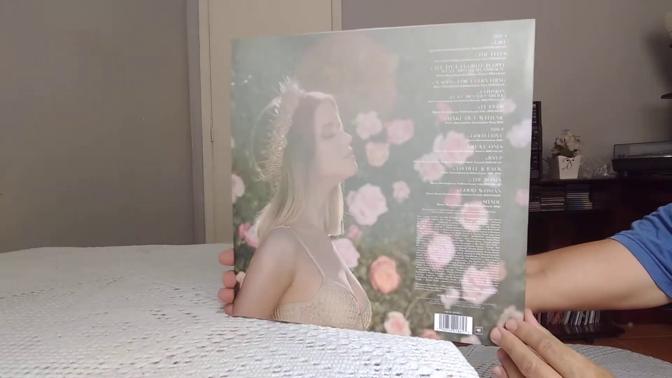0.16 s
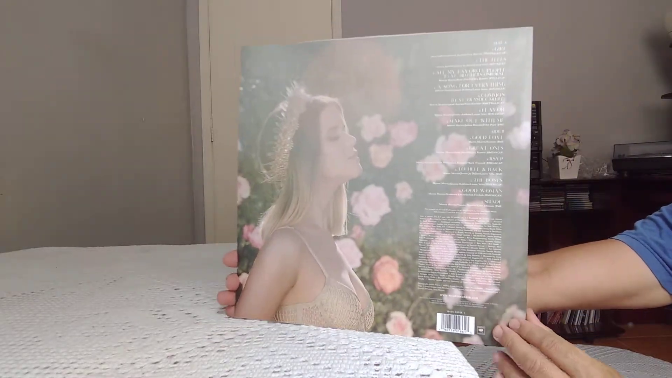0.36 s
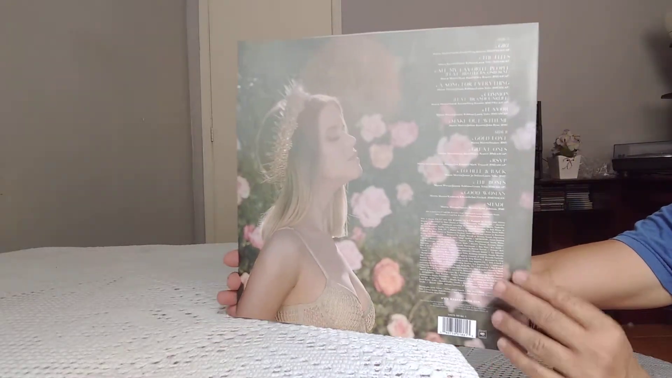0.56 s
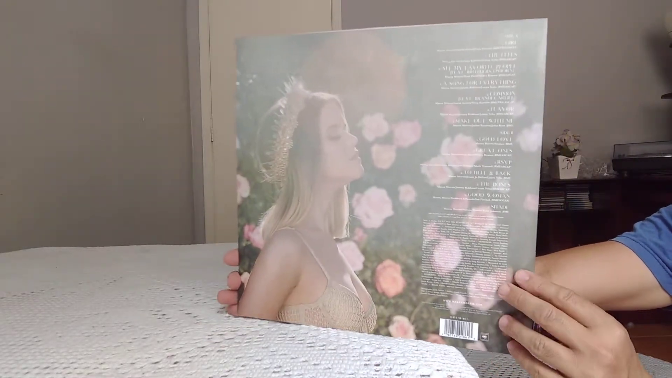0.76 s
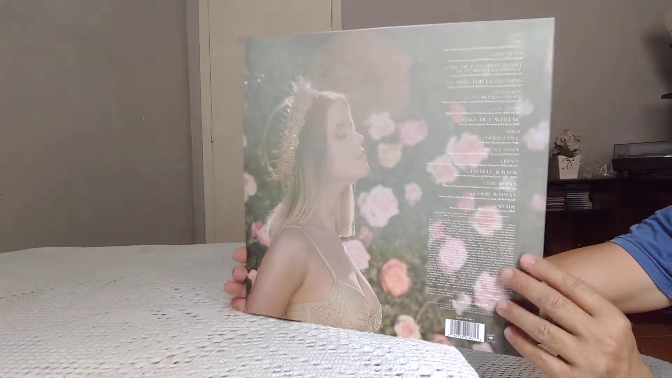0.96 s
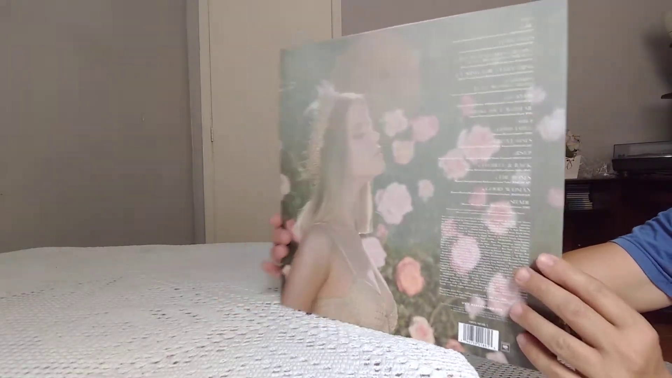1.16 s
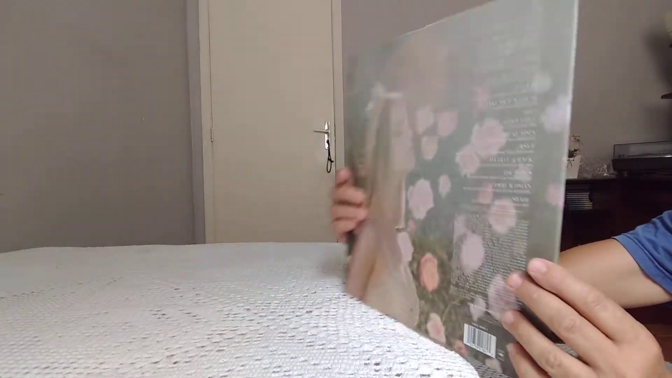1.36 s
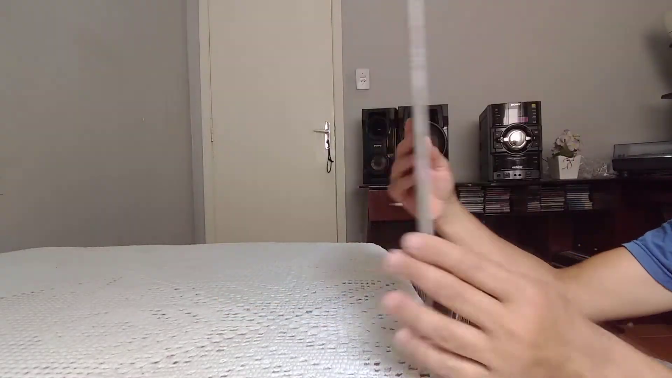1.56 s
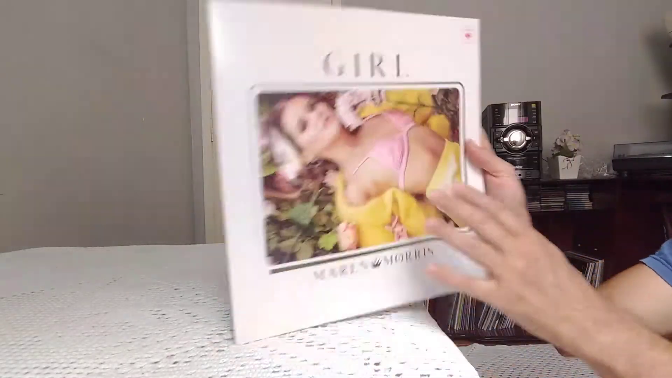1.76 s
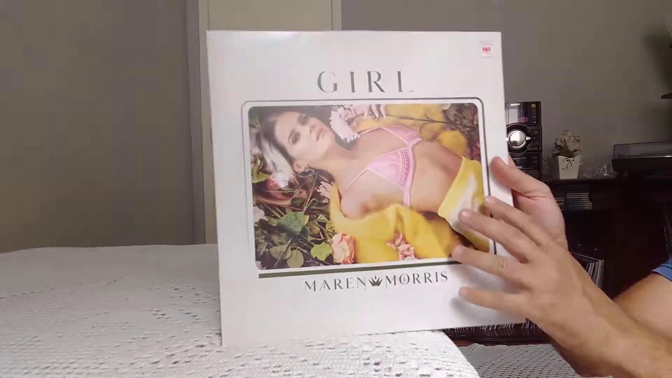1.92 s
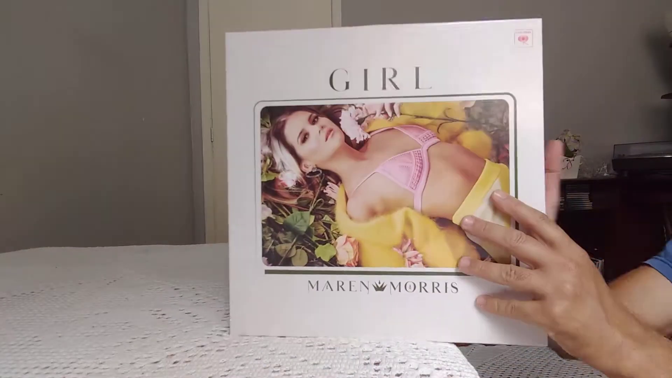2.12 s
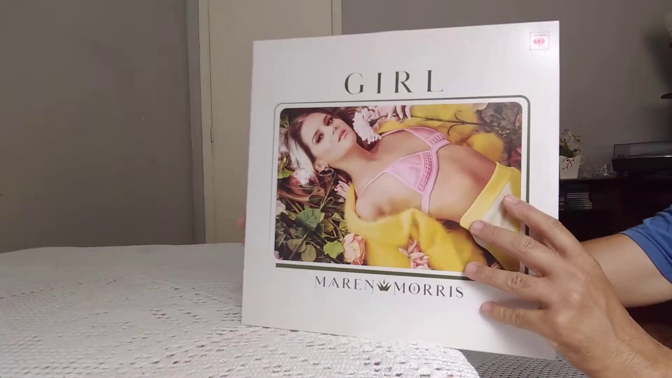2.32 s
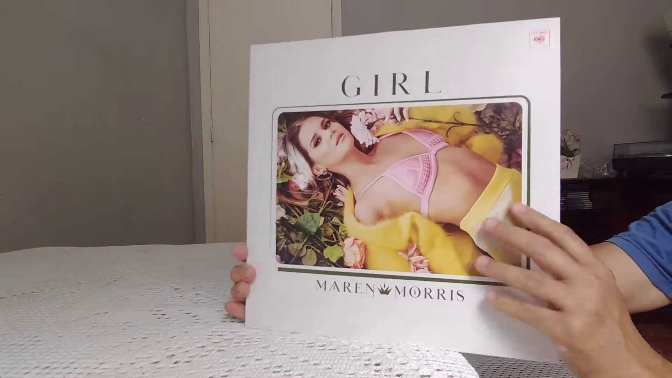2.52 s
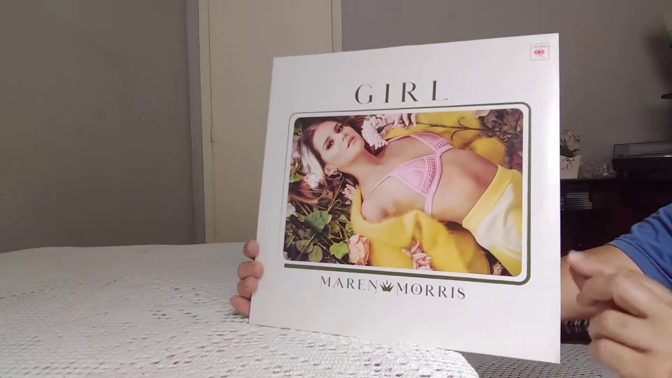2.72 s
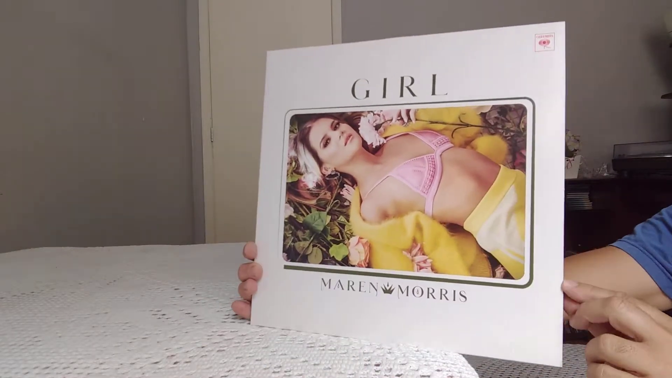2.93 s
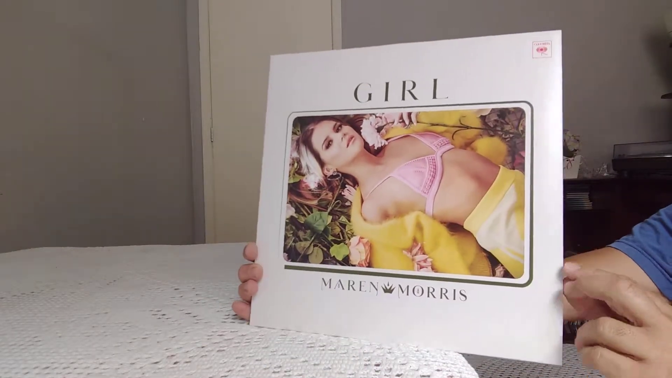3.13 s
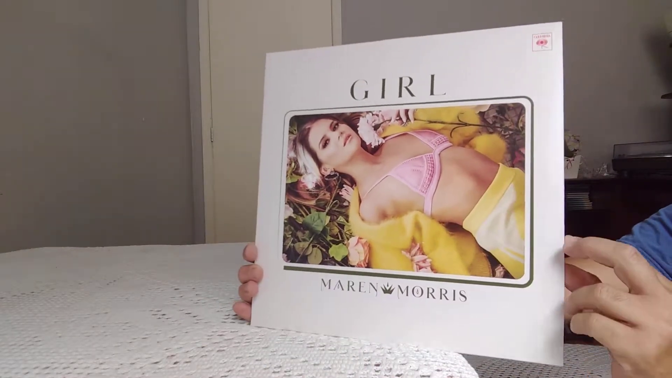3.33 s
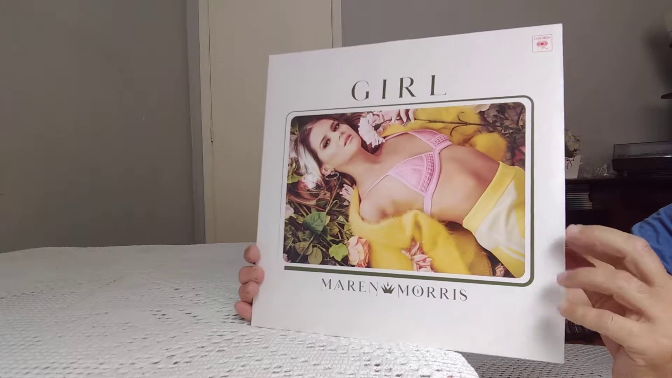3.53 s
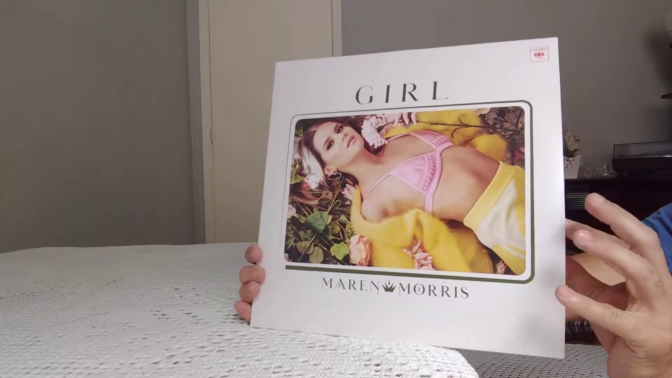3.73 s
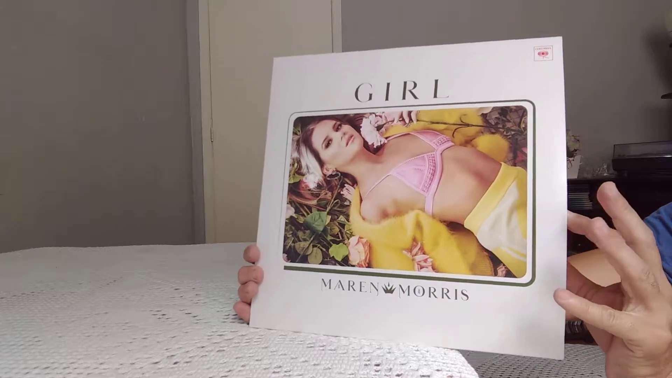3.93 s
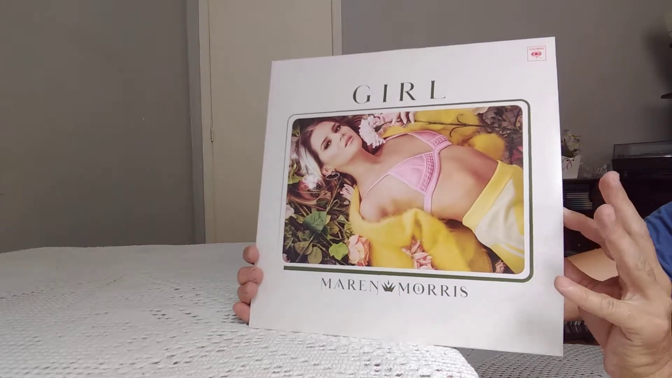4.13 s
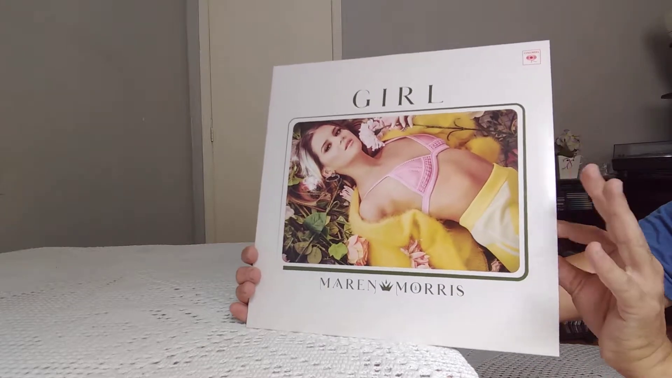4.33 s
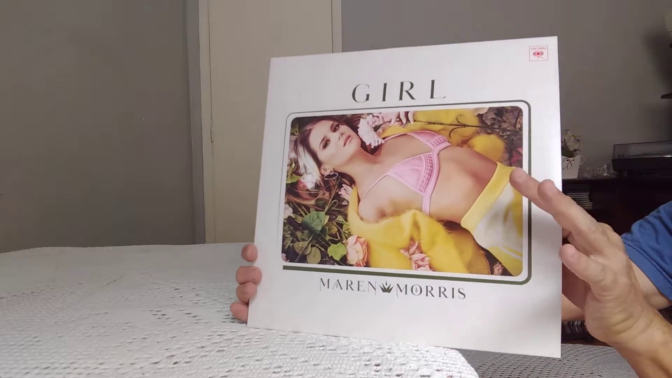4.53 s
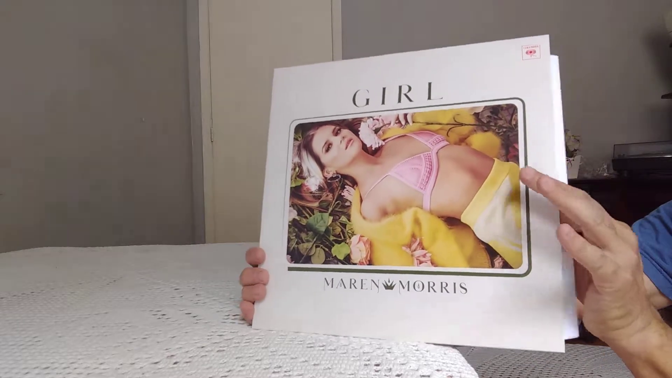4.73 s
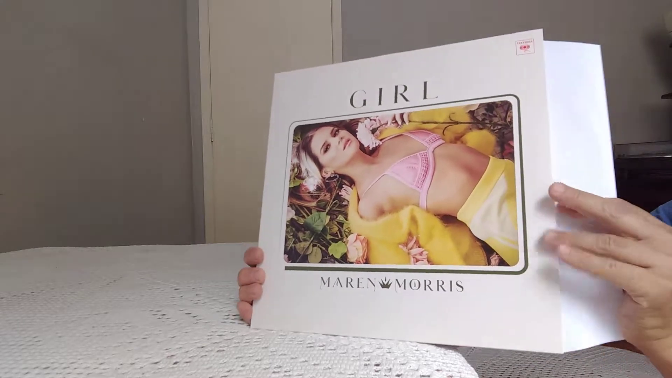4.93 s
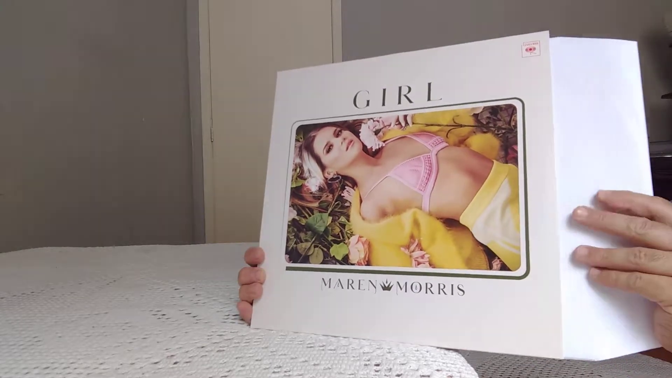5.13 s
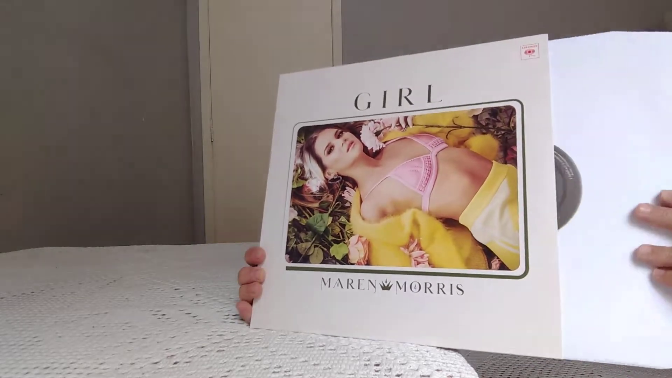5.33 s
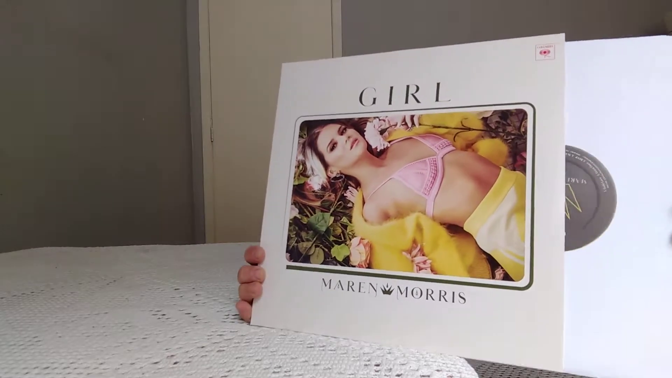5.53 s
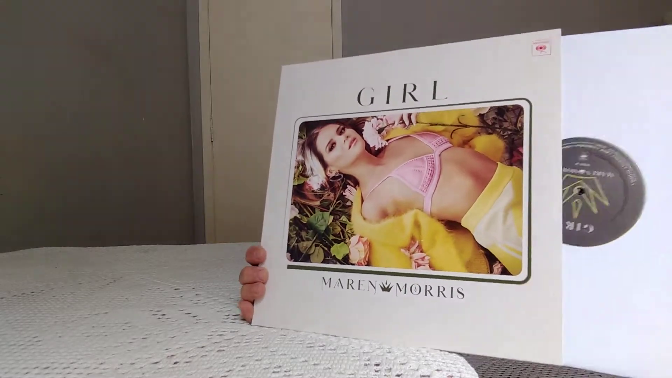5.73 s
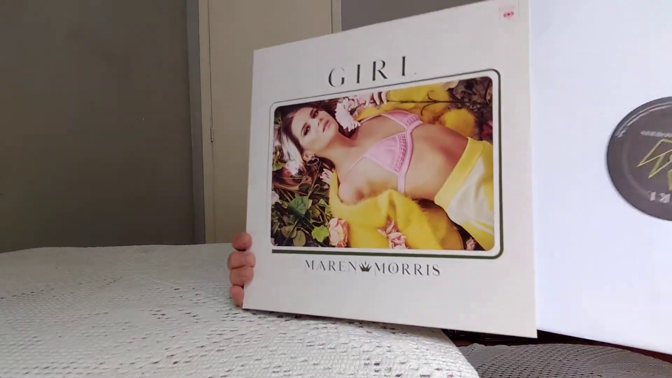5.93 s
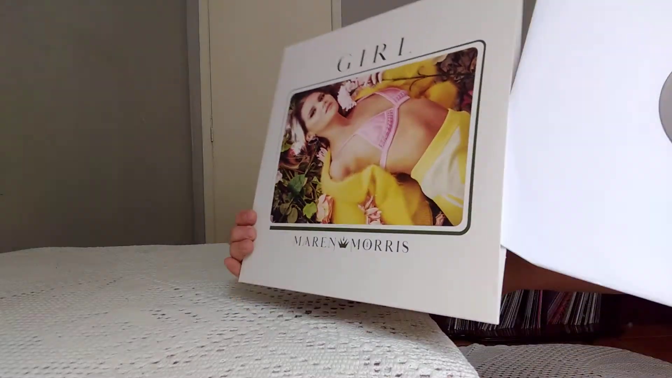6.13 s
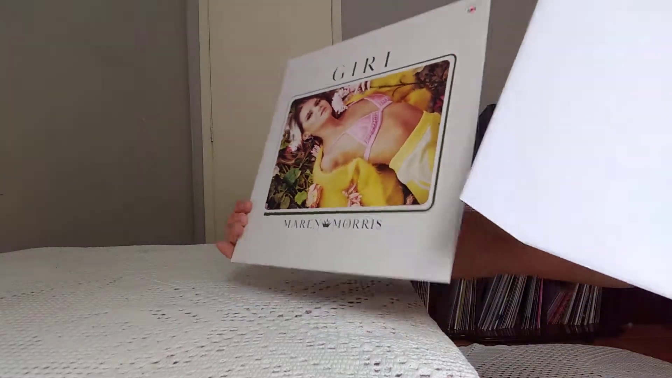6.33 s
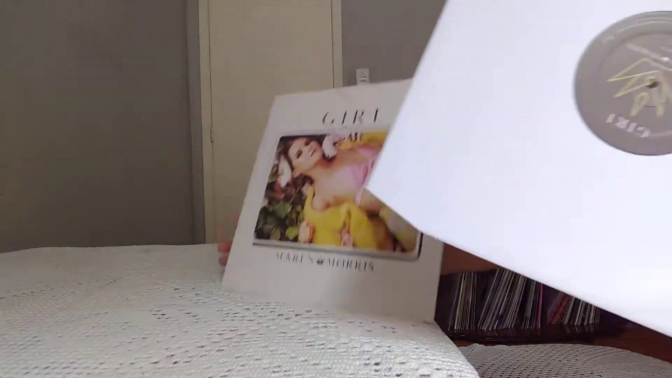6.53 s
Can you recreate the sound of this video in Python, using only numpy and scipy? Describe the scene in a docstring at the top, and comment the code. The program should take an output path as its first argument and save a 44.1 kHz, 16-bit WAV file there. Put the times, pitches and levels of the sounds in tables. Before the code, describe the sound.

Close stereo handling in a small quiet room, with steady low room air, faint hiss and a barely audible whine underneath. From 0 to 1 s, hands softly rub a plastic-wrapped card jacket. Around 1.1-1.7 s it is turned with a louder rustle, clustered crackles, dry ticks and a thin high squeak. Rubbing continues gently to 4.4 s, with small taps near 1.9, 2.4, 2.6, 3.5 and 3.8 s and a crisp scuff at 3.13. A firmer rub at 4.5 s leads into a grainy paper slide, lasting until about 5.6 s, with a sharp bright snap at 5.23, nearer the right. After a lull, a second pull starts at 5.7, catching strongly around 6.1 s with clicks, dull bumps and a high squeak. It eases by 6.4 s; two short, hollow cardboard knocks rattle at 6.58 and 6.63 s, just before the end.

```python
"""Record jacket handled on a cloth

A shrink-wrapped record jacket is turned over on a cloth-covered table in a quiet room: shaped noise rubs,
random slips crackle, and fingers tap and tick on the card. The paper inner sleeve slides out in two pulls,
its edge snapping once as a burst of dying modes, and the jacket's own modes ring as it knocks down at the end.
Faint squeaks and steady room air lie beneath. A small two-port recorder widens the stereo picture."""
import sys
import numpy as np
from scipy import signal
from scipy.fft import rfft, irfft, next_fast_len
from scipy.io import wavfile

SR = 44100
rng = np.random.default_rng(int(sys.argv[2]) if len(sys.argv) > 2 else 0)


def pcm_store(signal):
    """Save signal as 16-bit PCM."""
    levels = np.round(np.clip(np.atleast_2d(signal), -1, 1) * 32767)
    wavfile.write(sys.argv[1], SR, levels.astype(np.int16).T)


N = 294049
PADDED = next_fast_len(N + SR // 4, True)  # room for filter tails
TIME, FREQS = np.arange(N) / SR, np.fft.rfftfreq(PADDED, 1 / SR)

# what a fingernail tick or a crease rings with: pitch_hz [Hz], level_db [dB], t60_s [s]
TICK_MODES = [(920, -20.5, 0.013), (1570, -3, 0.0025), (2100, -9, .004), (3270, -8, 0.003),
              (6200, -13, .0012)]


def amp(db):
    """Decibels to gain."""
    return 10 ** (np.asarray(db) / 20)


def evened(x):
    """Scales to an rms of one."""
    return x / np.sqrt(np.mean(x ** 2) + 1e-20)


def read(points, hz):
    """Reads a spectrum table on a log-frequency axis."""
    f, value = np.transpose(points)
    return np.interp(np.log(hz + 1), np.log(f + 1), value)


def add(mix, s, sound):
    """Mixes a sound in at time s, cut off at the end of the scene."""
    part = mix[:, max(round(s * SR), 0):][:, :sound.shape[-1]]
    part += sound[..., :part.shape[1]]


def shaped(x, gain):
    """Filters a full-length signal by a gain for each frequency."""
    return irfft(rfft(x, PADDED) * gain, PADDED)[..., :N]


def low_cut(hz, order):
    """Gain that fades out the lows below hz."""
    return 1 / (1 + (hz / (FREQS + 1)) ** order)


def wander(hz):
    """Random drift, mostly slower than hz."""
    return evened(shaped(rng.standard_normal(N), 1 / (1 + (FREQS / hz) ** 4)))


def ports(pair):
    """Gives two unrelated signals the likeness that two ports hear, strongest in the middle."""
    # likeness of the two ports: pitch_hz [Hz], likeness [-1 to 1]
    likeness = [(60, 0.12), (130, 0.2), (300, 0.55), (640, 0.68), (1400, 0.5), (3000, -0.12), (14000, 0)]
    same = np.clip(read(likeness, FREQS), -1, 1)
    left = shaped(pair[1], same) + shaped(pair[0], np.sqrt(1 - same ** 2))
    return np.array([left, pair[1]])


def from_right(pair, amount):
    """The recorder's body shades the left port, mostly in the treble, from sounds on the right."""
    # full shading of the left port, scaled by amount: pitch_hz [Hz], level_db [dB]
    shadow = [(60, -4), (250, -2), (600, 0), (1200, -3.5), (2400, -2), (4400, -4.5), (8000, -7.5),
              (14000, -6.5)]
    return np.array([shaped(pair[0], amp(amount * read(shadow, FREQS))), pair[1]])


def ring(modes, t):
    """Sum of sine modes, each dying by 60 dB in its t60."""
    return sum(amp(db - 60 * t / t60) * np.sin(2 * np.pi * hz * t) for hz, db, t60 in modes)


def struck_card(centre_hz, t, reach_octaves=0.43):
    """A blow rings the jacket's modes nearest its own pitch."""
    # modes of the jacket: pitch_hz [Hz], level_db [dB, before the blow's weighting], t60_s [s]
    card_modes = [(120, -8, 0.16), (179, -2.5, .2), (240.5, 5, 0.097), (343, -0.5, 0.07),
                  (394, -2.5, 0.056), (616, -6, 0.064), (980, -19, 0.018), (1646, -13, 0.019),
                  (1890, -12, 0.018), (2060, -15.5, .022), (3220, -8, 0.015)]
    excited = []
    for hz, db, t60 in card_modes:
        distance = np.log2(hz / centre_hz) / reach_octaves
        excited.append((hz, db - 10 * np.log10(1 + distance ** 4), t60))
    return ring(excited, t)


def scatter(x, share, decay_s):
    """Card, table and hands return each sound many times within a few milliseconds."""
    t = np.arange(SR // 25) / SR
    response = rng.standard_normal((2, len(t))) * np.exp(-t / decay_s)
    returns = signal.fftconvolve(x, response / np.linalg.norm(response[0]), axes=1)[:, :N]
    return x + share * shaped(returns, low_cut(350, 2) / (1 + (FREQS / 11000) ** 4))


def together(levels_db):
    """Level of several unrelated sounds at once: their powers add."""
    return 10 * np.log10(sum(amp(db) ** 2 for db in levels_db) + 1e-20)


def stroke(s, rise, fall, db, hiss_db):
    """Scrape and hiss levels of one stroke: the contact speeds up and slows down along a bell."""
    bell_db = -20 / np.log(10) * ((TIME - s) / np.where(TIME < s, rise, fall)) ** 2
    return db + bell_db + np.array([[0], [hiss_db]])


def flexing(scrape_db, flex_db):
    """The card flexes more under harder rubbing, but grows more slowly than the scrape."""
    firm_db, growth = -51.5, 0.71  # scrape at which flexing is flex_db; dB of flexing per dB of scrape
    return flex_db + growth * (scrape_db - firm_db)


def friction(levels, colour, catch_db, chatter_db, trims_db, brightening, dulling=0.23):
    """Countless fibre slips shake the card; they clump into brief catches and the contact pressure chatters."""
    # resonances of the hand-held card: pitch_hz [Hz], width_hz [Hz], lift_db [dB]
    card_body = [(145, 8, 6), (181.5, 11.4, 11), (225, 5.9, 10.5), (271.4, 17, 5.5), (468, 59, 4.5),
                 (636, 23, 2.5), (868, 53, 2.5), (1234, 35, 4.5), (1836, 19, 4)]
    flex_db, scrape_db, hiss_db = levels
    grip = evened(amp(catch_db * wander(680) + chatter_db * wander(37)))
    # contact passes between patches of card, each with its own paths to the ports
    contact = np.array([wander(2.49) for _ in range(4)]) ** 2
    contact /= np.linalg.norm(contact, axis=0)
    patches = sum(c * scatter(rng.standard_normal((2, N)), share=0.95, decay_s=0.009) for c in contact)
    drive = ports(grip * patches)
    lift_db = sum(db / (1 + (2 * (FREQS - hz) / width) ** 2) for hz, width, db in card_body)
    body = amp(read(colour, FREQS) + lift_db)
    # low notes are the flexing card, the middle is the scraping contact, the top is surface hiss
    above_flex, above_scrape = low_cut(600, 6), low_cut(5000, 8)
    shares = 1 - above_flex, above_flex - above_scrape, above_scrape
    flex, scrape, hiss = (evened(shaped(drive, share * body)) * amp(db + trim)
                          for share, db, trim in zip(shares, levels, trims_db))
    # faster rubbing is brighter as well as louder
    top = shaped(hiss, low_cut(8000, 8))
    brighter = top * (amp(brightening * (hiss_db + 64.0)) - 1)
    # a soft contact that hisses little also loses the upper part of its scrape
    edge = shaped(scrape, low_cut(2500, 4))
    duller = edge * (amp(dulling * (hiss_db - scrape_db)) - 1)
    return flex + scrape + hiss + brighter + duller


def clicking(pushes, modes):
    """Each sudden push rings briefly and reaches the left port a little later."""
    lag_s = 0.00023
    t = np.arange(SR // 30) / SR
    click = np.array([ring(modes, np.maximum(t - lag_s, 0)), ring(modes, t)])
    return signal.oaconvolve(pushes[None], click, axes=1)[:, :N]


def crackle(level_db, modes, per_s, spread_db):
    """Tiny separate slips at random moments, a few of them larger."""
    sizes_db = level_db + spread_db * np.minimum(rng.exponential(1, N), 3)
    pushes = amp(sizes_db) * rng.choice([-1., 1.], N)
    return clicking(pushes * (rng.random(N) < per_s / SR), modes)


def pocket(level_db, width_hz):
    """Scraping sounds the air in the jacket's pocket: a broad, moving resonance."""
    # air resonance, moving as the card bulges and the mouth opens: time_s [s], pitch_hz [Hz]
    air_path = [(1.4, 1049), (2.5, 1448), (3.5, 1198), (3.8, 882), (4.0, 930), (4.27, 1084), (4.5, 1110),
                (4.6, 1200), (4.9, 1540), (5.2, 1500), (5.38, 1398), (5.6, 1268), (5.74, 1330), (5.9, 1540),
                (6.15, 1473)]
    turns = np.cumsum(np.interp(TIME, *np.transpose(air_path))) / SR
    drift = np.array([wander(width_hz), wander(width_hz)])
    return ports(evened(drift * np.sin(2 * np.pi * turns)) * amp(level_db))


def background(air_db=-60.5, whine_hz=1800, whine_db=-82):
    """Room air is coloured noise, heard as steady rumble and hiss; a narrow noise band whines faintly."""
    # colour of the room air: pitch_hz [Hz], density_db [relative dB per Hz]
    air_colour = [(25, -17), (40, -1), (56, 16.5), (80, -6), (150, 3.5), (220, -2.5), (320, -4),
                  (500, -9.5), (1000, -12.5), (1800, -17), (3000, -20.5), (5500, -17.5), (8000, -23.5),
                  (14000, -29.5)]
    air = evened(shaped(ports(rng.standard_normal((2, N))), amp(read(air_colour, FREQS))))
    whine = evened(shaped(rng.standard_normal((2, N)), 1 / (1 + ((FREQS - whine_hz) / 45) ** 2)))
    return amp(air_db) * air + amp(whine_db) * whine


def squeaks(width_share=0.025, trim_db=-1):
    """Skin and card squeak and groan: short fuzzy whistles swell and fade, sliding as the grip changes."""
    # start_s [s], length_s [s], pitch_hz [Hz, midway], glide_hz [Hz], level_db [dB, before trim and swell]
    whistles = [(.0, 0.098, 2690, 0, -66.5), (0.059, 0.14, 5850, 100, -66), (0.384, 0.19, 3300, 0, -70.5),
                (0.765, 0.17, 6050, -100, -71), (1.459, .12, 222.8, 0, -57), (1.492, 0.11, 6230, -60, -54),
                (1.59, .17, 5980, -300, -62), (2.393, 0.11, 6170, -120, -64.5), (2.898, 0.2, 5640, 0, -72),
                (3.173, 0.19, 6020, -80, -67), (3.38, .2, 5990, -100, -69), (4.262, 0.0277, 1089, 0, -58.5),
                (6.215, 0.16, 6720, -180, -53)]
    out = np.zeros((2, N))
    for s, length, hz, glide, db in whistles:
        t = np.arange(round(length * SR)) / SR
        turns = np.cumsum(hz + glide * (t / length - .5)) / SR
        low_pass = signal.butter(2, width_share * hz, fs=SR)
        fuzz = signal.lfilter(*low_pass, rng.standard_normal((2, SR)))[:, -len(t):]
        whistle = evened(fuzz * np.sin(2 * np.pi * turns))
        add(out, s, amp(db + trim_db) * whistle * np.sin(np.pi * t / length))
    return out


def jacket(pocket_db=-10, pocket_width_hz=260, crackle_db=-1):
    """Hands and tablecloth rub the wrapped card, and the wrap crackles under them."""
    # colour of rubbing on the wrap: pitch_hz [Hz], density_db [relative dB per Hz]
    wrap_colour = [(50, -13), (100, 6.5), (140, 8.5), (220, 3.5), (350, 1.5), (650, -1), (1200, -2),
                   (1900, 1.5), (2800, 2.5), (4400, 0), (5600, -7.5), (7200, -11), (11000, -11.5),
                   (14000, -15)]
    # strokes of hands and tablecloth over the jacket, levels before trims:
    # fastest_s [s], rise_s [s], fall_s [s], scrape_db [dB], hiss_db [dB above scrape]
    strokes = [(0.12, 0.16, 0.14, -61, -8.5), (1.0, 0.066, 0.056, -69.5, 4.5),
               (1.135, 0.064, 0.1, -58.5, 0.5), (1.29, 0.066, 0.052, -57, 2),
               (1.35, 0.046, 0.1, -50.5, -0.5), (1.46, 0.052, 0.065, -53, 3),
               (1.615, 0.08, 0.047, -61.5, 9.5), (1.7, 0.067, 0.18, -61.5, 1.5),
               (1.87, 0.093, 0.23, -57, -5), (2.065, 0.093, 0.064, -57, 0), (2.17, 0.043, 0.078, -59.5, -4),
               (2.44, 0.13, 0.056, -60.5, -5.5), (2.63, 0.15, 0.052, -57.5, 3),
               (2.78, 0.08, 0.13, -66, -10), (2.96, 0.18, 0.081, -64, -5), (3.128, 0.008, 0.0086, -51, -4),
               (3.25, 0.065, 0.39, -64, -7), (3.52, 0.04, 0.14, -59.5, -3.5),
               (3.78, 0.065, 0.054, -59, -4.5), (3.95, 0.047, 0.033, -61, -6),
               (4.28, 0.036, 0.045, -64, -2), (4.485, 0.086, 0.11, -52.5, -2)]
    # the holding hand never rests entirely: its scrape, its hiss above that, how much and how fast it fidgets
    hold_db, hold_hiss_db, fidget_db, fidget_hz = -68, -9, 2, 3.7
    hold = hold_db + fidget_db * wander(fidget_hz) + np.array([[0], [hold_hiss_db]])
    scrape_db, hiss_db = together([hold] + [stroke(*row) for row in strokes])
    levels = flexing(scrape_db, flex_db=-55.5), scrape_db, hiss_db
    rub = friction(levels, wrap_colour, catch_db=0.45, chatter_db=1.28, trims_db=(.5, -2, 2), brightening=0.27)
    creases = crackle(scrape_db + crackle_db, TICK_MODES, per_s=110, spread_db=5.0)
    return from_right(rub + creases + pocket(scrape_db + pocket_db, pocket_width_hz), amount=0.83)


def ticks():
    """Fingernails and stiff creases of the wrap click against the card, each a push that rings the tick modes."""
    # sharp ticks: start_s [s], push_db [dB, before the ringing]
    clicks = [(.9958, -43), (1.2065, -43), (1.3462, -37), (1.3645, -38), (1.3935, -40), (1.4355, -32),
              (1.4372, -35), (1.6283, -37), (1.7467, -41), (1.8505, -41), (1.8853, -42), (1.9994, -42),
              (2.3556, -42), (2.3701, -43), (2.4233, -36), (2.4262, -39), (2.441, -42), (2.6077, -35.5),
              (2.6108, -40), (2.9582, -40), (3.4955, -38), (3.5007, -36.5), (3.5224, -41), (3.549, -42),
              (3.6545, -41.5), (3.7928, -42), (3.7962, -42), (4.0092, -47), (4.2645, -47), (4.4253, -40),
              (4.4904, -40), (4.4985, -39), (6.0835, -37), (6.1178, -33), (6.134, -31), (6.1595, -36)]
    pushes = np.zeros((1, N))
    for s, db in clicks:
        add(pushes, s, amp([db]))
    return from_right(clicking(pushes[0], TICK_MODES), amount=0.73)


def room(x):
    """Sparse reflections of a small furnished room, fed by the right port, the highest treble dying first."""
    # reverberation: pitch_hz [Hz], t60_s [s]
    reverb_times = [(150, 0.54), (1000, 0.31), (5000, 0.38), (14000, 0.041)]
    echoes = rng.choice([-1., 1.], (2, SR // 2)) * (rng.random((2, SR // 2)) < 3000 / SR)
    echoes[:, :SR // 200] = 0  # nothing returns in the first 5 ms
    hz, t, z = signal.stft(echoes, SR, nperseg=256)
    decay = amp(-60 * t / read(reverb_times, hz)[:, None])
    tail = signal.istft(z * decay, SR, nperseg=256)[1]
    return ports(signal.fftconvolve(x[1:], tail / np.linalg.norm(tail[0]), axes=1)[:, :N])


def taps(width_octaves=0.6, treble_db=-4, scuff_db=-5, ring_db=-4, damping_s=0.0068):
    """Each touch lands with a short scuff and rings the card, which the hand quickly damps."""
    # taps and scuffs of fingers and edges on the card, levels before the trims above:
    # start_s [s], level_db [dB], centre_hz [Hz], treble_db [dB], decay_s [s, of the scuff]
    touches = [(1.333, -43, 1230, -15, 0.0075), (1.344, -39, 1190, 0, 0.012),
               (1.374, -39.5, 900, -12, 0.0064), (1.424, -37, 2600, -15, 0.0091),
               (1.434, -38, 1200, -8, 0.004), (1.626, -40, 1170, -6, 0.0026), (1.82, -41, 360, -18, 0.006),
               (1.868, -43.5, 610, -8, 0.0053), (1.998, -46.5, 1730, -19, 0.0073),
               (2.424, -44, 1500, -17, 0.005), (2.608, -44, 1600, -21, 0.0067),
               (3.126, -39, 2000, -4, 0.0031), (3.129, -37, 1300, 2, 0.0025),
               (3.495, -43, 1210, -19, 0.0045), (3.521, -41.5, 1070, 1, 0.005),
               (3.654, -41, 754, -30, 0.003), (3.778, -48.5, 886, -30, .005),
               (3.793, -46, 780, -30, 0.0082), (4.009, -44, 860, -30, 0.0049),
               (4.265, -47, 1080, -9, 0.007), (4.413, -45, 1330, -20, .005),
               (4.423, -44.5, 1100, -30, 0.0072), (4.465, -47.5, 800, -25, 0.0055),
               (4.489, -38.5, 800, -20, 0.008), (4.501, -39.5, 1050, -24, 0.0079),
               (5.713, -39.5, 970, 7, 0.0081), (6.021, -39, 450, -15, .01), (6.08, -35, 345, -3, 0.009),
               (6.104, -40, 750, -10, .008), (6.133, -31, 800, -5, 0.0044), (6.166, -40.5, 140, -30, 0.021),
               (6.285, -36.5, 1410, -20, 0.0062), (6.298, -34.5, 242, -17, 0.0083),
               (6.6275, -39, 3400, -20, .005), (6.636, -36, 1700, -20, .004)]
    scuffs, rings = np.zeros((2, N)), np.zeros((2, N))
    t = np.arange(4096) / SR
    hz = np.fft.rfftfreq(len(t), 1 / SR) + 1
    for s, db, centre, bright, decay in touches:
        body = 1 / (1 + (np.log2(hz / centre) / width_octaves) ** 2)
        treble = amp(bright + treble_db) / (1 + (3500 / hz) ** 4) / (1 + (hz / 8000) ** 2)
        scuff = evened(irfft(rfft(rng.standard_normal((2, len(t)))) * (body + treble)))
        envelope = np.exp(-t / decay) * (1 - np.exp(-t / 0.00044))
        add(scuffs, s, amp(db + scuff_db) * scuff * envelope)
        add(rings, s, amp(db + ring_db) * struck_card(centre, t) * np.exp(-t / damping_s))
    return from_right(ports(scuffs) + rings, amount=0.43)


def pull(curve):
    """Scrape and hiss levels of one pull on the sleeve, silent outside it."""
    # hiss grows as more paper comes into the open and falls once the sleeve is free:
    # time_s [s], hiss_db [dB above scrape]
    paper_hiss = [(4.6, -9), (4.85, -0.5), (5.17, -3), (5.3, 1.5), (5.6, 1.5), (5.9, 5.5), (6.13, 2.5),
                  (6.26, 1), (6.42, -5), (6.667, -4)]
    scrape_db = np.interp(TIME, *np.transpose(curve), -120, -120)
    return np.array([scrape_db, scrape_db + np.interp(TIME, *np.transpose(paper_hiss))])


def bump(s, db, rise_s=.01, fall_s=0.021):
    """Level of the flexing around a bump: a quick rise and a steady decay."""
    return db - 20 / np.log(10) * np.maximum((s - TIME) / rise_s, (TIME - s) / fall_s)


def sleeve(pocket_db=-11, pocket_width_hz=130, grain_db=3.5):
    """Paper slides out to the right, its fibres catching on the card."""
    # colour of rubbing paper: pitch_hz [Hz], density_db [relative dB per Hz]
    paper_colour = [(50, 3.5), (150, -5.5), (260, -6), (400, -9.5), (750, -5), (1050, 1.5), (1500, 2),
                    (2300, 1.5), (3200, 4.5), (4400, 0.5), (6200, -6), (7500, -7), (11000, -8),
                    (14000, -13)]
    # what a catching paper fibre rings with: pitch_hz [Hz], level_db [dB], t60_s [s]
    fibre_modes = [(1900, -6, 0.0032), (3600, -2, 0.0016), (6000, -5, .0012)]
    # pulls following the pulling speed, the edge snapping free in the first, which then runs out:
    # time_s [s], scrape_db [dB, before trims]
    first_pull = [(4.58, -68), (4.69, -50.5), (4.79, -49.5), (4.86, -50), (5.0, -51), (5.19, -52),
                  (5.25, -51), (5.33, -57), (5.46, -57.5), (5.52, -63), (5.69, -69)]
    second_pull = [(5.695, -65), (5.73, -55), (5.82, -50.5), (5.91, -51.5), (6.065, -51.5), (6.13, -43),
                   (6.19, -55), (6.26, -57), (6.42, -66), (6.667, -60.5)]
    # the paper catches on the jacket's mouth, levels before trims:
    # fastest_s [s], rise_s [s], fall_s [s], scrape_db [dB], hiss_db [dB above scrape]
    catches = [(4.85, .025, 0.037, -48.5, -10), (5.718, .008, 0.01, -56, 3), (6.1, 0.023, 0.031, -46, -6),
               (6.225, .015, 0.02, -56, 3.5), (6.282, 0.0087, 0.026, -51.5, 5.5),
               (6.55, 0.024, 0.017, -64.5, 4)]
    # the sleeve's rim bumps the card as it leaves and makes it flex: peak_s [s], flex_db [dB, before trims]
    rim_bumps = [(5.715, -48), (6.025, -48), (6.081, -50), (6.135, -45), (6.3, -42), (6.6, -46),
                 (6.635, -43)]
    pulls = [pull(first_pull), pull(second_pull)]
    scrape_db, hiss_db = together(pulls + [stroke(*row) for row in catches])
    flex_db = together([flexing(scrape_db, flex_db=-59)] + [bump(*row) for row in rim_bumps])
    rub = friction((flex_db, scrape_db, hiss_db), paper_colour,
                   catch_db=0.5, chatter_db=1.0, trims_db=(1.5, -.5, 4), brightening=0.12)
    grain = crackle(scrape_db + grain_db, fibre_modes, per_s=230, spread_db=3.8)
    return from_right(rub + grain + pocket(scrape_db + pocket_db, pocket_width_hz), amount=0.97)


def snap(start_s=5.2262, level_db=-4, shudder_lag_s=.001, left_db=-15, lowest_hz=170):
    """The paper edge buckles with a crack near the right port; the card shudders, too small for deep bass."""
    # modes of the sleeve's edge: pitch_hz [Hz], level_db [dB, before the snap's level], t60_s [s]
    edge_modes = [(1110, -20.5, 0.0072), (2094, -16.5, .007), (2970, -7, 0.0029), (3480, -14, .004),
                  (4300, -8.5, .0035), (6200, 4.5, 0.0018), (7080, 8, 0.0011), (8091, -14, .003),
                  (9800, -4.5, 0.0028), (12600, -5, .001)]
    # modes of the shuddering card: pitch_hz [Hz], level_db [dB, before the snap's level], t60_s [s]
    shudder_modes = [(268, -37.5, 0.09), (347, -31.5, 0.028), (470, -36, .012), (636, -30, 0.009)]
    out, t = np.zeros((2, N)), np.arange(SR // 8) / SR
    onset = 1 - np.exp(-t / 0.00021)
    add(out, start_s, amp(level_db) * ring(edge_modes, t) * onset)
    add(out, start_s + shudder_lag_s, amp(level_db) * ring(shudder_modes, t))
    out[0] = shaped(out[0], amp(left_db * low_cut(2000, 2)))  # the left port loses the treble
    return signal.lfilter(*signal.butter(2, lowest_hz, "high", fs=SR), out)


def knocks(rattle_db=-22, rattle_s=0.031, left_db=-4):
    """The jacket meets the table and rings freely, with a brief rattle of loose card."""
    # start_s [s], level_db [dB, scales ring and rattle], centre_hz [Hz that the blow excites most]
    blows = [(6.5838, -32.5, 450), (6.5857, -26, 1730), (6.588, -35, 600), (6.631, -25, 1690),
             (6.6337, -29.5, 234)]
    out, t = np.zeros((2, N)), np.arange(SR // 4) / SR
    for s, db, centre in blows:
        low_pass = signal.butter(2, centre, fs=SR)
        rattle = evened(signal.lfilter(*low_pass, rng.standard_normal((2, len(t)))))
        add(out, s, amp(db) * (struck_card(centre, t) + amp(rattle_db) * rattle * np.exp(-t / rattle_s)))
    return out * amp([[left_db], [0]])


def scene():
    """Rubbing, blows and their reflections over the room's background."""
    fingers, bumps = taps() + ticks(), knocks()
    crack = scatter(snap(), share=0.37, decay_s=0.0025)
    # the crack beams its brightest part at the recorder, so the room gets less of that
    beam_db, beam_hz, beam_width_hz = -7, 6200, 900
    spilled = shaped(crack, amp(beam_db / (1 + ((FREQS - beam_hz) / beam_width_hz) ** 2)))
    echoes = room(amp(-8.0) * fingers + amp(-12.5) * bumps + amp(-15.5) * spilled)
    handling = jacket() + sleeve() + fingers + bumps + crack
    return handling + echoes + squeaks() + from_right(background(), amount=0.068)


def record(dry):
    """The widener subtracts a delayed copy of each port from the other; then the bass cut and the band limit."""
    # share of the opposite port that is subtracted: pitch_hz [Hz], level_db [dB]
    crossfeed = [(60, -5), (600, -5.5), (1200, -3), (2450, -.4), (3700, -3.5), (5000, -4), (7500, -9),
                 (14000, -9)]
    delay_s, feedback, bass_cut_hz, top_hz = .000407, 0.33, 44, 14350
    cross = amp(read(crossfeed, FREQS)) * np.exp(-2j * np.pi * FREQS * delay_s)
    # part of the delayed copy circulates, which narrows the notches of the comb
    loop = feedback * cross
    mid = shaped(dry[0] + dry[1], (1 - cross) / (1 - loop))
    side = shaped(dry[0] - dry[1], (1 + cross) / (1 + loop))
    wide = np.array([mid + side, mid - side]) / 2
    cut = signal.sosfilt(signal.butter(4, bass_cut_hz, "high", fs=SR, output="sos"), wide)
    band_limit = signal.firwin(511, top_hz, window=("kaiser", 9), fs=SR)
    return signal.oaconvolve(cut, band_limit[None], "same")


dry = scene()
out = record(dry)
pcm_store(out)
```